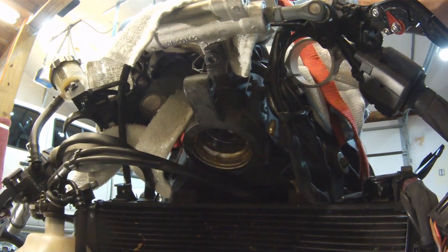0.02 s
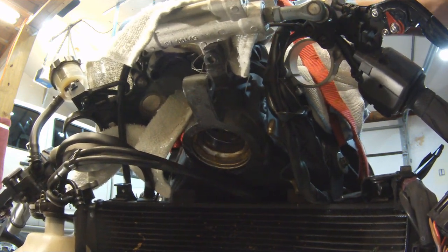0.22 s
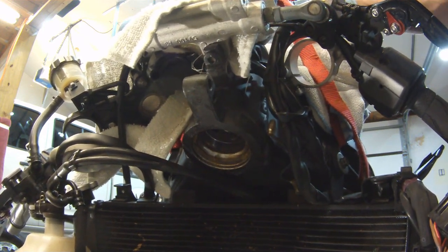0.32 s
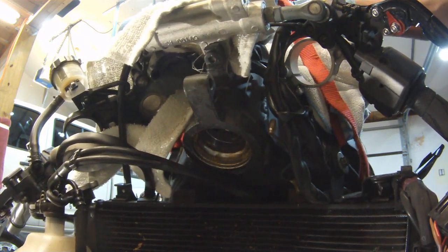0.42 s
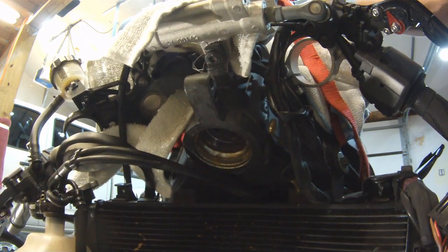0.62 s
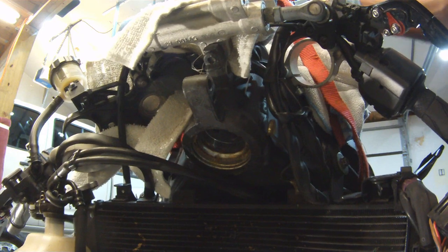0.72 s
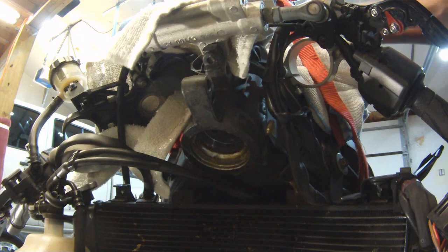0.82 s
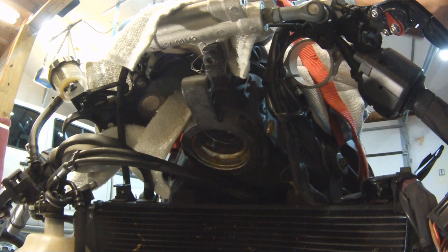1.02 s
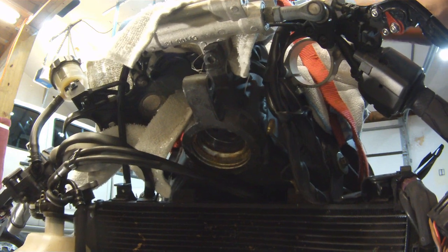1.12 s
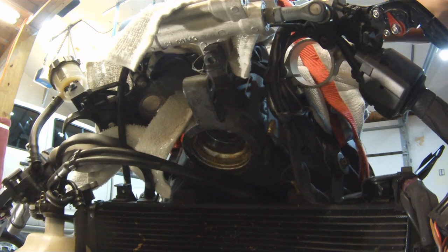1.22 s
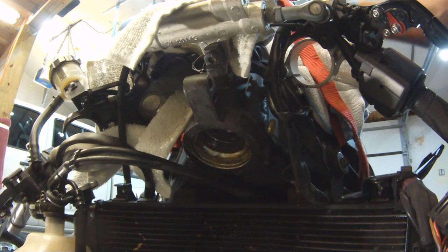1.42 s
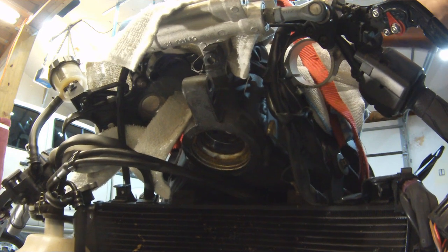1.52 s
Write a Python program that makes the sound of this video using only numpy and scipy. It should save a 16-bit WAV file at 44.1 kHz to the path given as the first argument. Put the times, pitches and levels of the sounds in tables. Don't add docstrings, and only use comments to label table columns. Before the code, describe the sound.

The faint tail of an earlier blow, then four steady hammer strikes on steel, each with a brief metallic ring, double thud, loose bracket rattle and quick wall echo, close-miked in a reverberant garage.

```python
import sys
import numpy as np
from scipy import signal
from scipy.fft import rfft, irfft, next_fast_len
from scipy.io import wavfile
from scipy.ndimage import uniform_filter1d

SR = 44100
rng = np.random.default_rng(int(sys.argv[2]) if len(sys.argv) > 2 else 0)


def gain_from_db(level_db):
    decades = np.asarray(level_db, float) / 20
    return 10 ** decades


def generate_wav(sig):
    pcm = np.round(np.clip(np.atleast_2d(sig).T, -1, 1) * 32767).astype(np.int16)
    wavfile.write(sys.argv[1], SR, pcm)


N = 68355
LEAD = SR // 4
BLOW_TIME = np.arange(SR // 2) / SR
MODE_SCATTER_DB = 2


def along(points, hz):
    f, v = np.transpose(points)
    return np.interp(np.log(hz + 1), np.log(f + 1), v)


def coloured(x, points):
    m = next_fast_len(len(x) + 8192)
    gain = gain_from_db(along(points, np.fft.rfftfreq(m, 1 / SR)))
    return irfft(rfft(x, m) * gain, m)[:len(x)]


def unit(x):
    return x / np.sqrt(np.mean(x ** 2) + 1e-20)


def noise(length, points):
    return unit(coloured(rng.standard_normal(length), points))


def ring(modes, t, scatter_db, rise_s, blur_hz=0):
    u = np.maximum(t, 0)
    total = np.zeros(len(t))
    for hz, db, t60, *polarity in modes:
        level_db = db + scatter_db * rng.standard_normal() - 60 * u / t60
        drift = np.cumsum(rng.standard_normal(len(t))) * np.sqrt(2 * np.pi * blur_hz / SR)
        total += np.prod(polarity) * gain_from_db(level_db) * np.sin(2 * np.pi * hz * u + drift)
    return total * (1 - np.exp(-u / rise_s))


def add(track, x, s):
    part = track[round(s * SR) + LEAD:][:len(x)]
    part += x[:len(part)]


# start in seconds, thud level in dB, crack level in dB,
# clatter level in dB, clatter tilt in dB per octave.
BLOWS = [
    (-.12, -33.5, -46, -65, 0.1),
    (0.2271, -11, -24, -22, -0.5),
    (0.574, -9.5, -20.5, -30.5, 2.5),
    (0.9044, -11.5, -22, -25, -0.5),
    (1.2502, -12, -27, -28.5, 2),
]
# punch ring in dB, loose bracket in dB, wall echo in dB, rattle in dB.
LANDING = [(-57, -51.5, 10.5, -72.5), (-28, -34.5, 4.5, -45), (-20.5, -24, -0.9, -46.5),
           (-31, -27, -2.5, -44.5), (-27, -21.5, -1, -44.5)]


def hammer():
    out = np.zeros(N + LEAD)
    for blow, landing in zip(BLOWS, LANDING):
        s, thud_db, crack_db, clatter_db, tilt_db = blow
        punch_db, bracket_db, echo_db, rattle_db = landing
        thud = gain_from_db(thud_db) * frame_thud()
        crack = gain_from_db(crack_db) * impact_crack()
        punch = gain_from_db(punch_db) * punch_ring()
        clatter = panel_clatter(clatter_db, tilt_db, bracket_db)
        body = thud + clatter + crack
        add(out, body + punch + gain_from_db(rattle_db) * loose_rattle(), s)
        far_wall(out, s, echo_db, thud, clatter, crack, punch)
        tail = room_tail(body + gain_from_db(1.5) * punch)[:len(BLOW_TIME)]
        add(out, tail + gain_from_db(thud_db) * room_boom(), s)
    return out[LEAD:]


# frequency in Hz, level in dB, t60 in seconds, signed polarity.
STRUCK_MODES = [(139.5, 2, 0.053, 1), (183, 8, 0.018, -1.25), (483.7, 8.5, 0.047, 1),
                (580, -5.5, 0.071, -0.62), (642, -4, .03, 0.72), (837, -7, 0.033, -1.2)]
# frequency in Hz, level in dB, t60 in seconds, signed polarity.
SEATED_MODES = [(140.7, 0, 0.056, -0.94), (211, 1.5, 0.0087, -1.24), (266.8, -5.5, 0.25, -1.33),
                (351.8, 16, 0.027, 0.79), (411.4, 4.5, .1, 0.94), (463, 2, 0.05, -0.87),
                (613.8, -8.5, 0.1, 0.84), (903, 2, 0.024, 0.54)]


def frame_thud():
    seat_s = .0086
    struck = ring(STRUCK_MODES, BLOW_TIME, 0, .0001)
    return struck + ring(SEATED_MODES, BLOW_TIME - seat_s, 0, .0001)


# frequency in Hz, level in dB.
CRACK_SPECTRUM = [(300, -120), (700, -3), (2000, -3.5), (4800, -10.5), (7200, -8.5), (11000, -10.5),
                  (15200, -21.5), (16800, -48)]


def impact_crack():
    rise_s, t60 = 0.00035, 0.033
    burst = noise(len(BLOW_TIME), CRACK_SPECTRUM)
    return burst * (1 - np.exp(-BLOW_TIME / rise_s)) * gain_from_db(-60 * BLOW_TIME / t60)


# frequency in Hz, level in dB, t60 in seconds.
PUNCH_MODES = [(3650, -37.5, 0.075), (3830, -4, 0.024), (4130, -3.5, 0.017), (5620, -24, 0.013),
               (6200, -36, 0.02), (7173, 8.5, 0.017), (7560, -11.5, 0.026), (9100, -39, 0.014),
               (9000, -6, 0.021), (10015, 6, 0.01), (11800, -33, 0.043), (12700, -53, .025),
               (15400, -35.5, .03)]


def punch_ring():
    return ring(PUNCH_MODES, BLOW_TIME, MODE_SCATTER_DB, 0.00017, blur_hz=150)


# frequency in Hz, level in dB, t60 in seconds.
PANEL_MODES = [(681.5, 1, .08), (743.5, 3.5, 0.17), (820, 7, 0.048), (940, -3, 0.02), (983, -29, 0.023),
               (1156.5, 10.5, 0.045), (1328, -8, 0.18), (1395, -2, 0.058), (1570, -2.5, 0.073),
               (1828, -2, .05), (2120, -3, 0.051), (2430, -15, .03)]
# frequency in Hz, level in dB, t60 in seconds.
BRACKET_MODES = [(1638, 7, 0.056)]
# frequency in Hz, level in dB.
DULL = [(100, 0.5), (1300, 0), (2200, -1.5), (5000, -10), (16000, -24.5)]


def panel_clatter(clatter_db, tilt_db, bracket_db):
    blur_hz = 45
    tilted = [(hz, db + tilt_db * np.log2(hz / 1000), t60) for hz, db, t60 in PANEL_MODES]
    panels = gain_from_db(clatter_db) * ring(tilted, BLOW_TIME, MODE_SCATTER_DB, 0.002, blur_hz)
    bracket = gain_from_db(bracket_db) * ring(BRACKET_MODES, BLOW_TIME, 0, 0.0011, blur_hz)
    return coloured(panels + bracket, DULL)


# frequency in Hz, level in dB.
RATTLE_SPECTRUM = [(800, -120), (1500, -6.5), (3200, 1), (4600, -12), (6000, -1.5), (9300, -10.5),
                   (11500, -15), (16000, -30)]


def loose_rattle():
    t60 = 0.49
    return noise(len(BLOW_TIME), RATTLE_SPECTRUM) * gain_from_db(-60 * BLOW_TIME / t60)


# frequency in Hz, level in dB.
WALL_SPECTRUM = [(300, -22), (2000, -25), (3700, -7.5), (5300, -19), (7200, -16.5), (11000, -21),
                 (16000, -29)]


def far_wall(out, s, echo_db, thud, clatter, crack, punch):
    bright = coloured(punch + gain_from_db(-9) * crack, WALL_SPECTRUM)
    dull_thud = coloured(thud, DULL)
    add(out, gain_from_db(echo_db) * (bright + gain_from_db(-6) * clatter), s + .0603)
    add(out, gain_from_db(echo_db - 11.5) * dull_thud, s + .0623)
    add(out, gain_from_db(echo_db - 15.5) * dull_thud, s + .0712)


# frequency in Hz, t60 in seconds.
ROOM_DECAY = [(100, .4), (260, .44), (700, .44), (1840, .45), (4850, .4), (7200, .36), (12000, .25)]
# frequency in Hz, level in dB.
ROOM_LEVEL = [(60, -1.5), (150, -7.5), (400, -11), (1200, -5), (3000, -14), (7000, -22.5), (15000, -19)]


def room_tail(x):
    hz, t, z = signal.stft(rng.standard_normal(SR // 2), SR, nperseg=256)
    decay = gain_from_db(-60 * t / along(ROOM_DECAY, hz)[:, None])
    tail = signal.istft(z * decay, SR, nperseg=256)[1]
    response = coloured(tail / np.linalg.norm(tail), ROOM_LEVEL)
    delayed = np.pad(x, (500, 0))
    return signal.fftconvolve(delayed, response)


# frequency in Hz, level in dB, t60 in seconds.
ROOM_MODES = [(128.6, -33, 1.2), (169, -34, 0.48), (275, -29, 0.72), (275, -28.5, 1.35), (298, -24.5, .45),
              (370, -30, .4), (406, -34, .3)]
# frequency in Hz, level in dB, t60 in seconds.
HOLLOW_MODES = [(440, -32, 1.1)]


def room_boom():
    boom = ring(ROOM_MODES, BLOW_TIME, 1, 0.015, blur_hz=14)
    return boom + ring(HOLLOW_MODES, BLOW_TIME, 0, .03)


# frequency in Hz, level in dB per Hz.
FLOOR_SPECTRUM = [(20, 8.5), (110, -14), (250, 0.5), (450, -15), (650, -14), (1300, -18), (2500, -23.5),
                  (16000, -31.5)]


def garage_floor():
    whine_hz, whine_db, floor_db = 5050, -79, -54.5
    whine = gain_from_db(whine_db) * np.sin(2 * np.pi * whine_hz * np.arange(N) / SR)
    return whine + gain_from_db(floor_db) * noise(N, FLOOR_SPECTRUM)


# frequency in Hz, level in dB per Hz.
RUMBLE_SPECTRUM = [(10, 0.5), (30, -11.5), (70, -13), (130, -21), (200, -120)]


def preamp_rumble():
    return gain_from_db(-58) * noise(N, RUMBLE_SPECTRUM)


def scene():
    radiated = signal.butter(2, 60, "high", fs=SR, output="sos")
    return (signal.sosfilt(radiated, hammer()) + garage_floor())[None]


def levelled(x):
    start_db, share, back_db_per_s = -12, 0.62, 4.5
    lag, smooth = int(.0152 * SR), int(.001 * SR)
    over_db = np.maximum(20 * np.log10(np.abs(x[0]) + 1e-9) - start_db, 0)
    loud, t = np.flatnonzero(over_db), np.arange(N) / SR
    onsets = loud[np.diff(loud, prepend=-N) > SR // 10]
    gain_db = np.zeros(N)
    for k in onsets:
        step_db = -share * over_db[k:k + lag].max() + back_db_per_s * (t - t[k])
        gain_db[k + lag:] = np.minimum(gain_db, step_db)[k + lag:]
    return x * gain_from_db(uniform_filter1d(gain_db, size=smooth))


def roll_off(x):
    return signal.sosfilt(signal.butter(12, 16530, fs=SR, output="sos"), x)


def record(dry):
    ceiling, hardness = .86, 6
    x = levelled(dry)
    x = x / (1 + np.abs(x / ceiling) ** hardness) ** (1 / hardness)
    x = signal.sosfilt(signal.butter(20, 15650, fs=SR, output="sos"), x)
    x = signal.sosfilt(signal.butter(2, 88, "high", fs=SR, output="sos"), x)
    return roll_off(x + preamp_rumble())


dry = scene()
out = record(dry)
generate_wav(out)
```